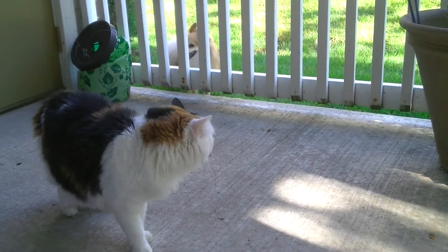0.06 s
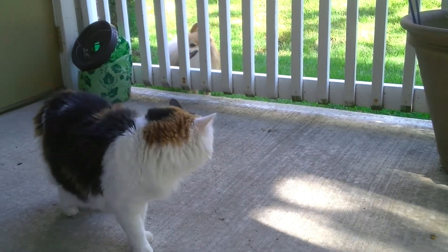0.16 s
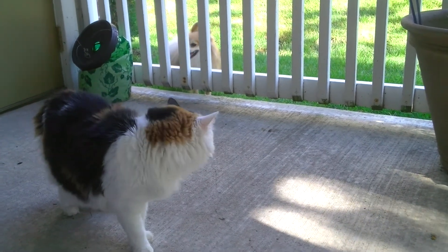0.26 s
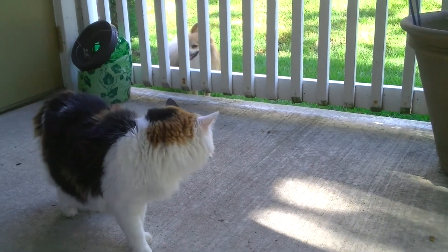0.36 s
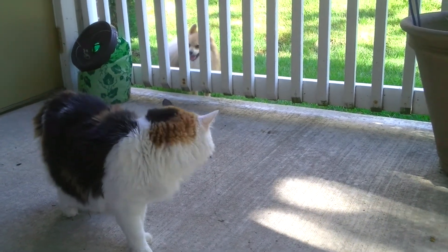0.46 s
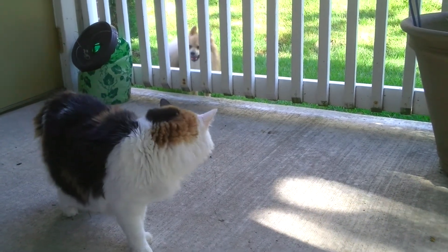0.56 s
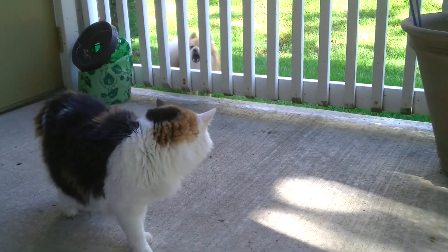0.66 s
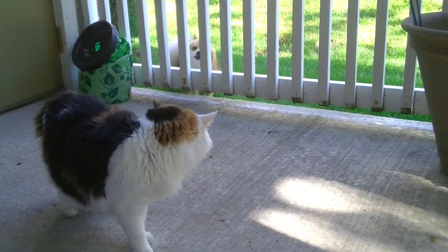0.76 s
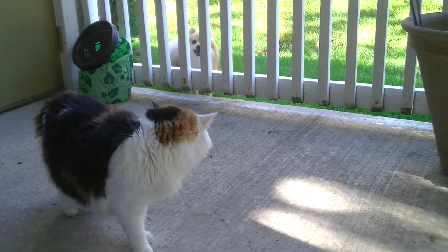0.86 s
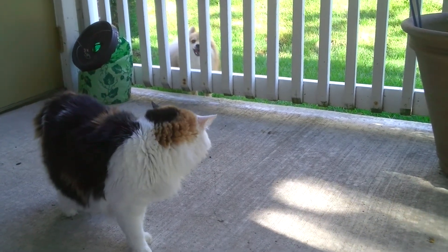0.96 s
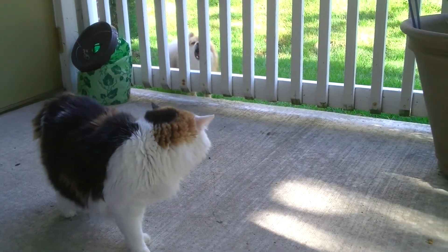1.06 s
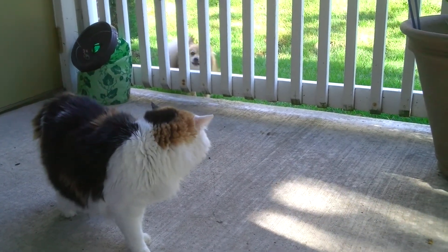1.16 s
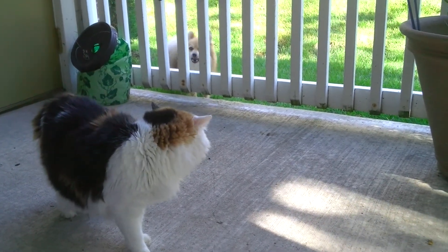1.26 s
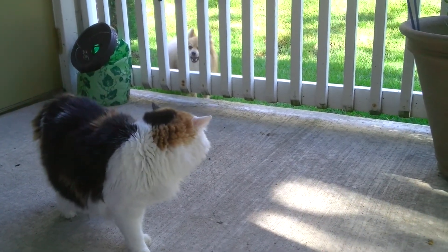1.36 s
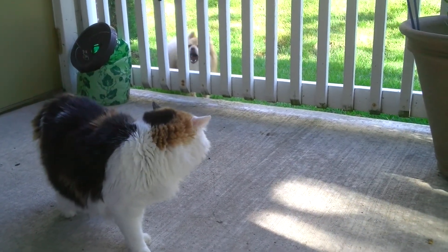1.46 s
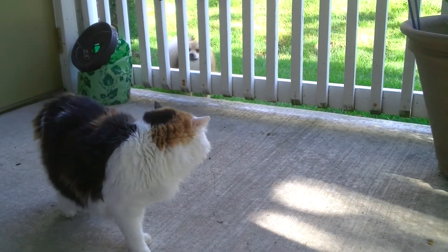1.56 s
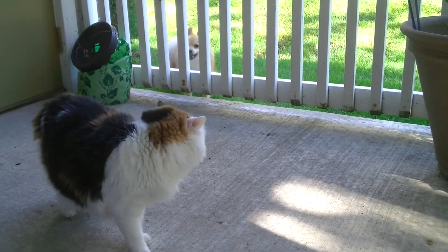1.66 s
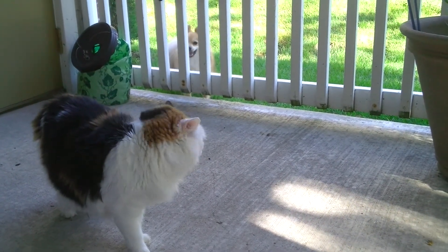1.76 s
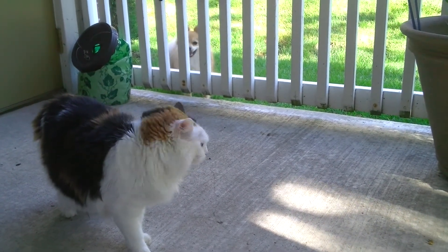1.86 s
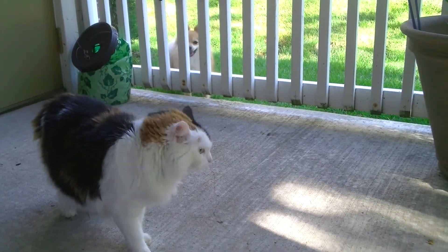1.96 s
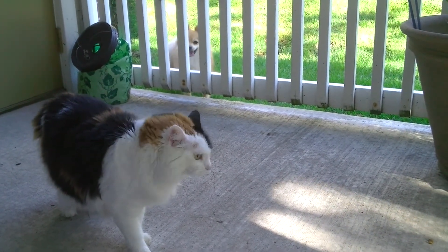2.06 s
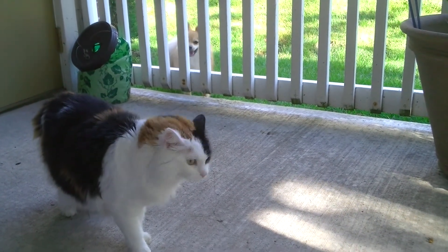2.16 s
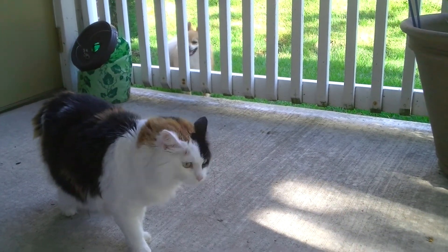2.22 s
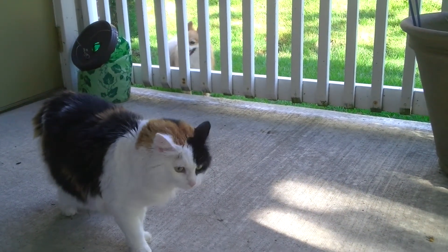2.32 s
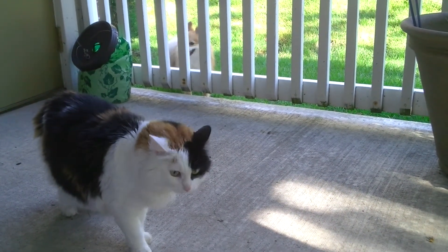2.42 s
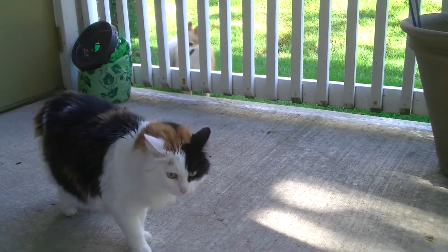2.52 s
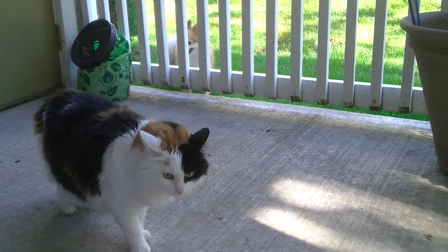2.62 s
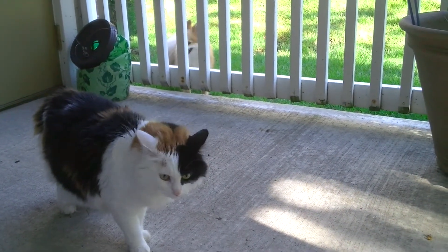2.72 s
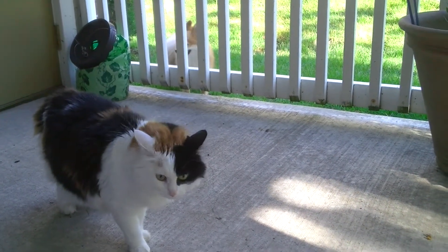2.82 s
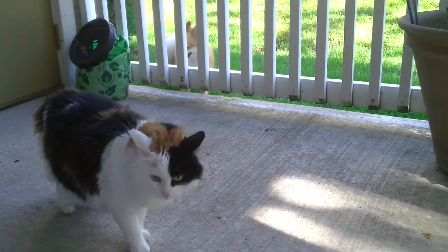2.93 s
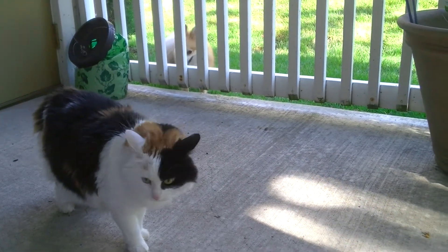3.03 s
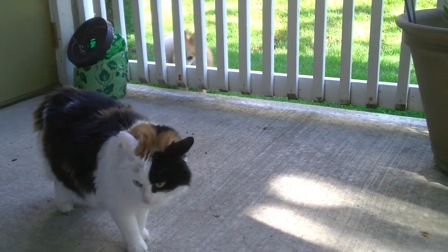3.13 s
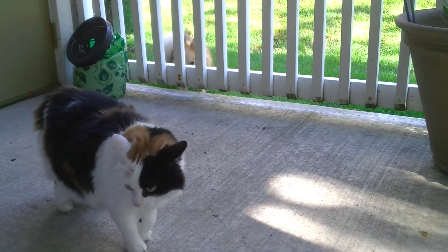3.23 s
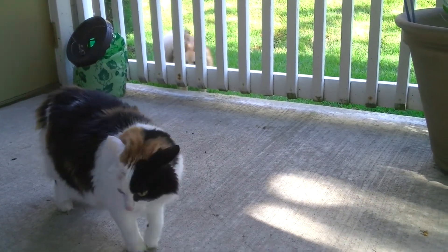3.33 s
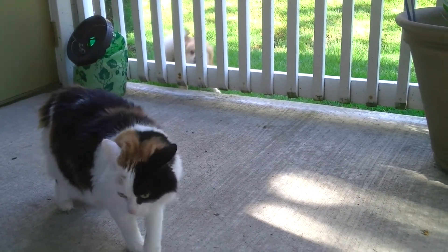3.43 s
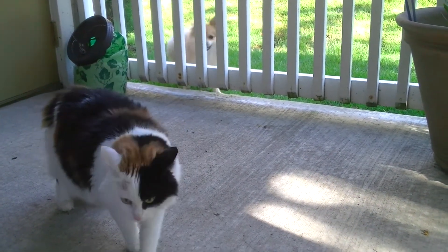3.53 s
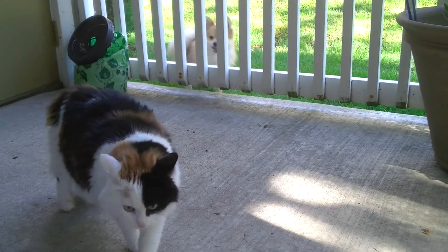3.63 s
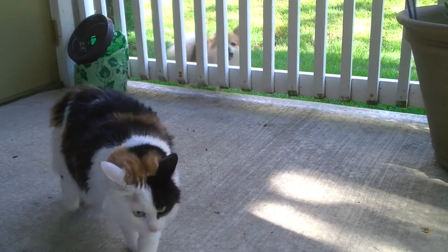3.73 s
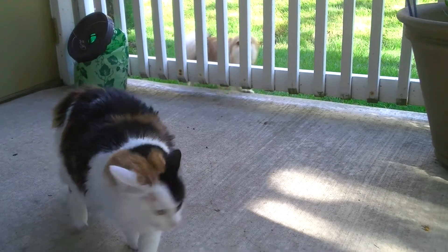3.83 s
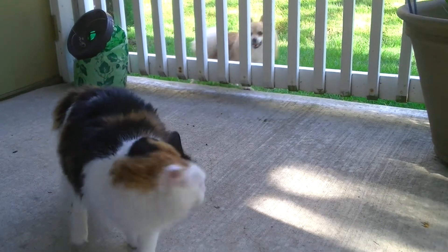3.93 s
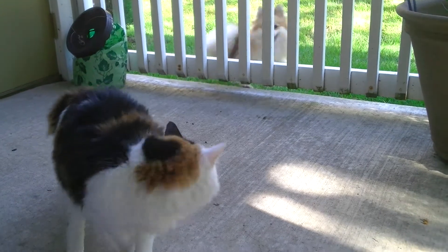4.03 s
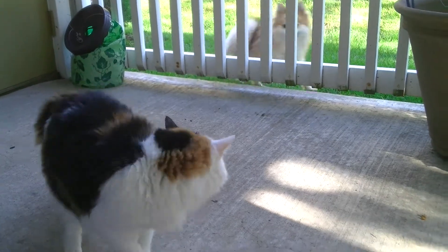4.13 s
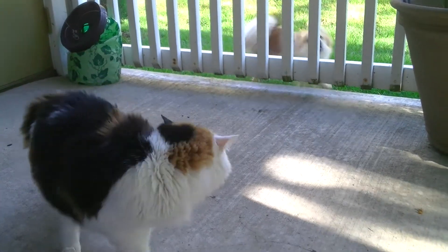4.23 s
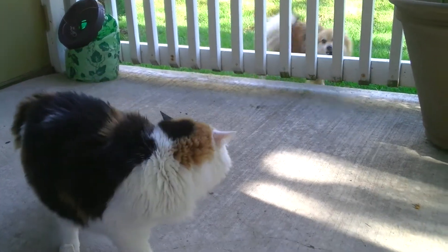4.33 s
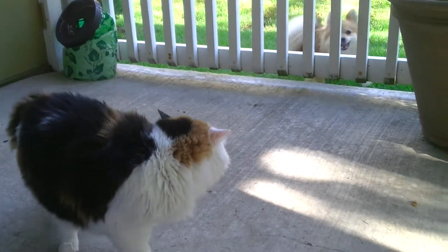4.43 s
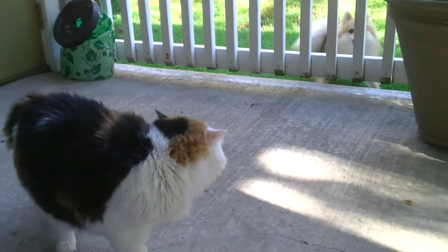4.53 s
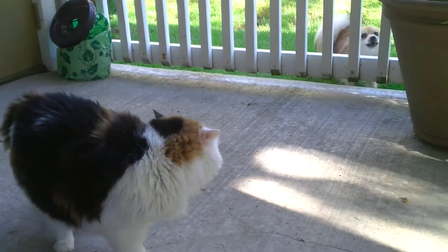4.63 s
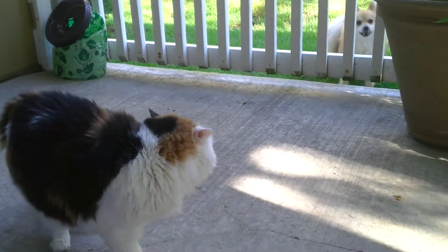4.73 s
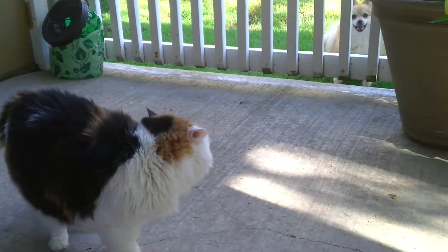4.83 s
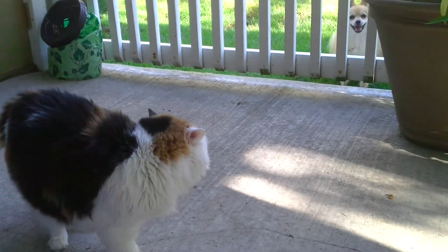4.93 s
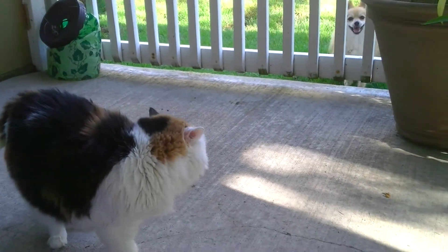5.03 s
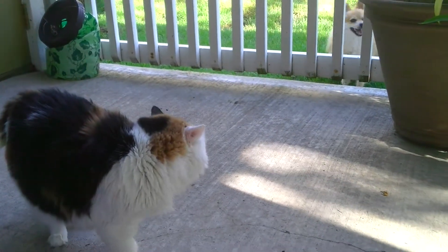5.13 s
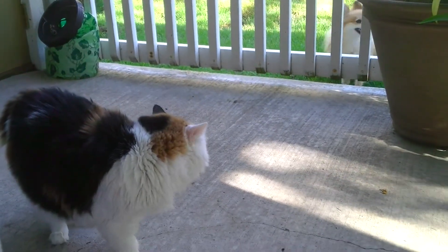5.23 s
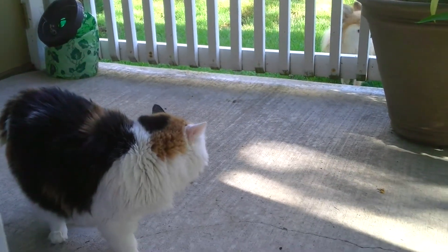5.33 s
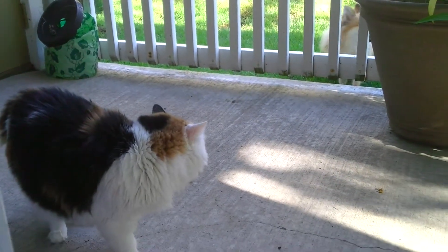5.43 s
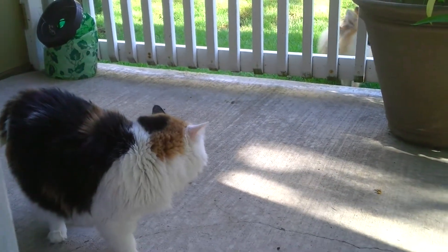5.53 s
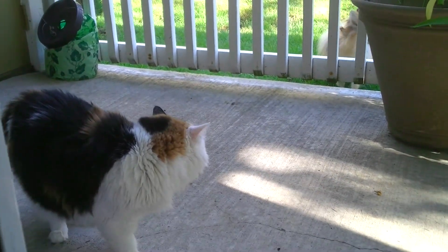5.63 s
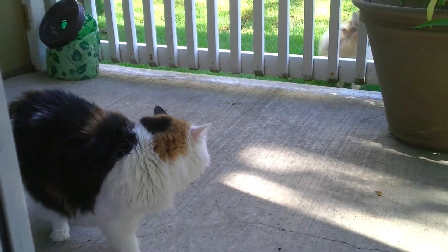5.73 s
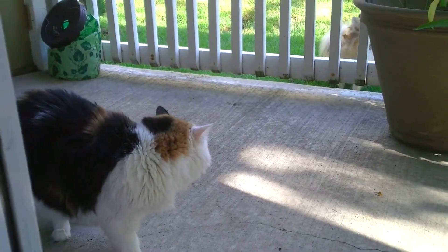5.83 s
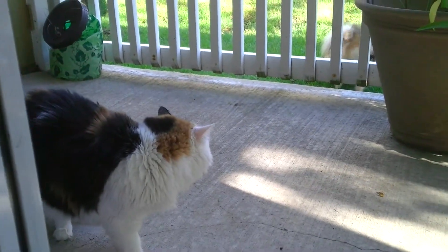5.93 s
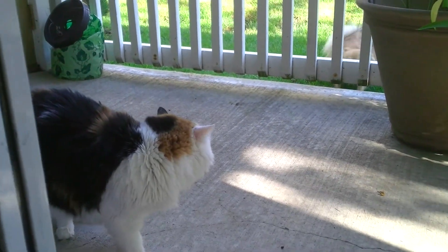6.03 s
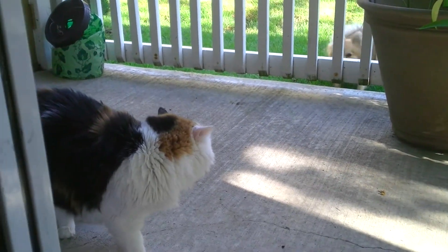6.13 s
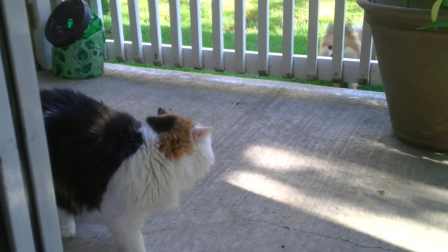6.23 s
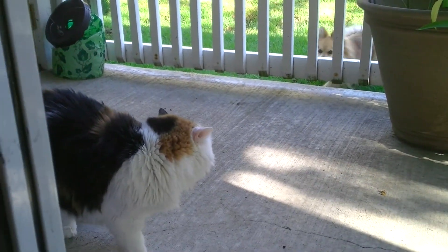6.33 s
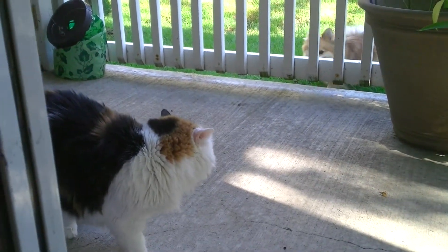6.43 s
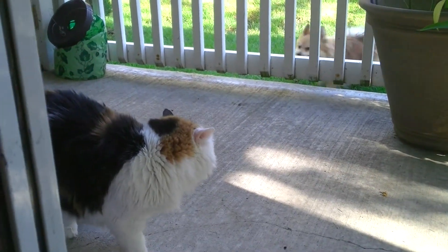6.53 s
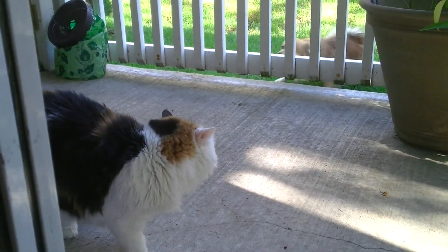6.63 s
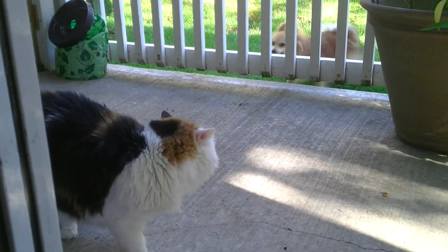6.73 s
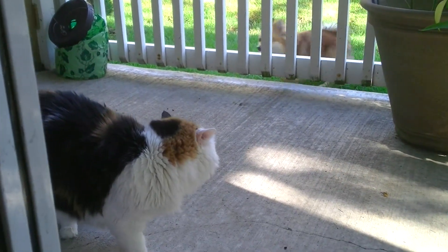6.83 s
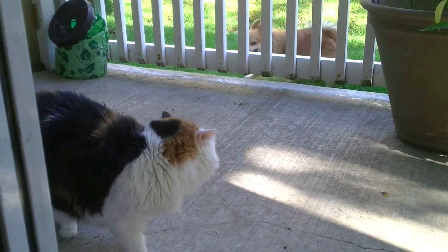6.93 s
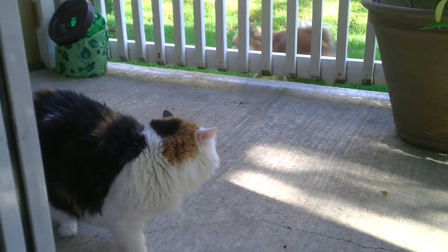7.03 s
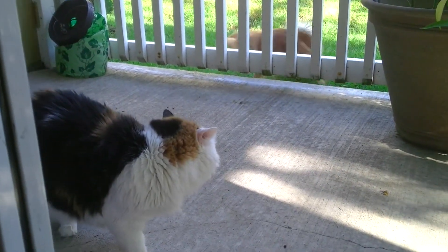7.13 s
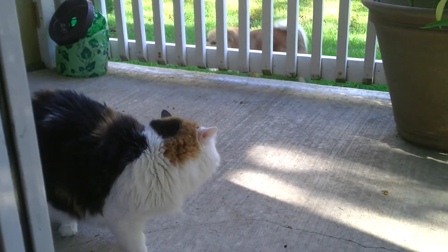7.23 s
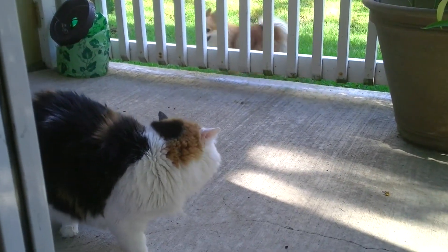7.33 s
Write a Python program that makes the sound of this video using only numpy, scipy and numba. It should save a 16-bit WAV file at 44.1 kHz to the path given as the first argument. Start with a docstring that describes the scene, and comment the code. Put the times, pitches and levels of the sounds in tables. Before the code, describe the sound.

A steady, faint outdoor hiss opens the scene, heard by a camera's stereo microphones on a concrete porch. At about 0.65 seconds a small dog on the lawn barks, then again at 1.1 and 1.5: hoarse, high, abrupt yelps around a seventh of a second long, arching up quickly and falling off as the mouth shuts. Each rings briefly on the porch and leaves a weak, slightly late echo from the yard. Between about 1.9 and 2.9 there are very soft rustles. A second burst of four barks comes at 3.3, 3.8, 4.2 and 4.6, growing lower and rougher. Two faint rustles follow near 5.25 and 5.5. A weaker, lower, raspier bark arrives at 5.95, then two strong, higher yaps at 6.55 and 7.1, the last tail fading into hiss. Peaks sound slightly held down, the extreme treble cut.

```python
"""A small dog on a lawn barks ten times in three bursts, heard by a camera's microphone pair on a concrete porch.
Each bark is one push of air: a hoarse yelp of uneven fold pulses and noise, arching in pitch and level,
which rings the mouth as the jaw opens and shuts. The porch rings, then come a faint delayed copy and the yard echo.
A steady outdoor hiss runs throughout, with soft rustles after the first and second bursts.
Last, the camera's limiter turns down peaks over its top level, and a low-pass cuts the extreme treble."""
import sys
import numpy as np
from scipy import signal
from scipy.fft import rfft, irfft, next_fast_len
from scipy.io import wavfile
from scipy.ndimage import uniform_filter1d, minimum_filter1d
from numba import njit

SR = 44100
rng = np.random.default_rng(int(sys.argv[2]) if len(sys.argv) > 2 else 0)


def inscribe(sig):
    """Save sig as 16-bit PCM at rate SR to the path in sys.argv[1].

    A 1-D sig is mono; a 2-D sig holds one channel per row.
    Samples are clipped to [-1, 1] before scaling.
    """
    pcm = np.round(np.clip(np.atleast_2d(sig).T, -1, 1) * 32767)
    wavfile.write(sys.argv[1], SR, pcm.astype(np.int16))


N = 325017

# colour of the echoes from across the yard: (frequency [Hz], level [dB])
YARD_COLOUR = [(200, -27), (600, 5.5), (800, 15), (950, -4.5), (1300, 2.5), (1500, 2), (1740, 3.5),
               (2400, -1), (4000, -3.5), (7000, -22.5), (14000, -43.5)]

# the folds tighten toward the crest and slacken after it; slack pitch and voicing are shares of the full ones
TIGHTEN_S, SLACKEN_S, SLACK_PITCH, SLACK_VOICING = 0.02, 0.065, 0.6, 0.38
# the mouth snaps widest just before the crest, then shuts: the tongue resonance sinks and the treble dulls
GAPE_LEAD_S, OPEN_S, SHUT_S, SHUT_OPENING = 0.0098, 0.027, 0.045, 0.5
TONGUE_SINK, DULLING_DB = 0.74, 13
# the voice is clearest at the widest gape and breaks up after it
VOICE_IN_S, VOICE_OUT_S = 0.016, 0.028
# breathy low body of the bark, near its fundamental pitch, strongest at the widest gape
BODY_HZ, BODY_WIDTH_HZ, BODY_S, BODY_DB = 518, 370, 0.014, -15
# the air rises steeply until shortly before the crest, swells on to it, then sags and stops
ATTACK_DB_PER_S, ATTACK_LEAD_S, SWELL_DB, RELEASE_S = 1300, 0.023, 6, 0.022
# the upper resonances change level for a moment at the widest gape, around a resting level
FLARE_S, BRIGHT_DB = 0.0097, -4.5


def dog():
    """Ten pushes of air at their moments, each placed left or right by a level difference."""
    # barks: (start [s], relative level [dB], top pitch before jitter [Hz], length [s], time to the crest [s],
    # sag after it [dB/s], nominal jaw resonance [Hz], tongue resonance at widest gape [Hz],
    # relative tongue level [dB], flare [dB], relative rasp level [dB], roughness [0-1],
    # left minus right before the microphone pair [dB])
    barks = [(0.649, -2, 697.8, 0.171, .062, 115, 1200, 3010, 7, 0.5, 3, 0.51, -4),
             (1.079, 0, 644.6, 0.139, 0.046, 131, 1545, 2750, -4.5, 13, 2, 0.47, -2),
             (1.475, 0, 653.5, 0.15, .052, 141, 1507, 2800, 2, 12.5, -1, 0.28, -1.5),
             (3.342, -1, 713.7, 0.13, 0.054, 123, 1280, 3020, -1.5, 9.5, -3, 0.52, 0.5),
             (3.762, -1.5, 641.2, 0.131, .047, 137, 1500, 2970, 7.5, 5.5, 3, 0.46, -1),
             (4.194, 0, 576.7, 0.12, 0.052, 109, 1500, 2720, -1.5, 8.5, -1, 0.62, -1),
             (4.572, -2, 591.7, 0.145, .053, 142, 1377, 2660, -.5, 11, 1, 0.61, 0.5),
             (5.956, -4, 525, 0.14, .06, 124, 1440, 2720, -1.5, -2, -3.5, 0.75, 3.5),
             (6.561, -0.5, 720.2, .14, 0.051, 93, 1590, 2980, 3, -16, -5.5, 0.63, 1),
             (7.122, -1.5, 688.8, 0.12, 0.049, 148, 1464, 3510, -4.5, 14.5, -4, 0.41, 0.5)]
    out = np.zeros((2, N + SR))
    for start, *shape, pan_db in barks:
        sound = bark(*shape)
        at = int(start * SR)
        sides = undb([[pan_db / 2], [-pan_db / 2]])
        out[:, at:at + len(sound)] += sound * sides
    return out[:, :N] * undb(-15.5)


def bark(db, top_hz, length, crest_s, sag_db_per_s, jaw_hz, tongue_hz, tongue_db, flare_db, rasp_db, rough):
    """One push of air tightens the vocal folds; their uneven pulses and puffs ring the opening and closing mouth."""
    # what leaves the mouth: (frequency [Hz], level [dB])
    mouth = [(100, -38), (300, -23.5), (550, -20.5), (850, -5), (1100, 5), (3200, 3), (5200, -4),
             (6800, -10), (8500, -14), (10000, -20), (11500, -48), (16000, -28)]
    # muzzle resonances behind the rasp: (nominal frequency [Hz], width [Hz], relative level [dB])
    muzzle = [(4160, 620, -3), (5360, 1600, -11.5), (7070, 524, 10.5)]
    n = SR // 5
    t = np.arange(n) / SR

    # push of air and fold tension
    tension = arch(t, crest_s, TIGHTEN_S, SLACKEN_S)
    attack = undb(ATTACK_DB_PER_S * np.minimum(t - crest_s + ATTACK_LEAD_S, 0))
    stop = np.clip((length - t) / RELEASE_S, 0, 1)
    swell_db = SWELL_DB * (tension - 1)
    sag_db = -sag_db_per_s * (t - crest_s)
    effort = attack * stop * undb(np.where(t < crest_s, swell_db, sag_db))
    pitch = top_hz * (SLACK_PITCH + (1 - SLACK_PITCH) * tension)

    # movement of the mouth
    gape_s = crest_s - GAPE_LEAD_S
    voicing = SLACK_VOICING + (1 - SLACK_VOICING) * arch(t, gape_s, VOICE_IN_S, VOICE_OUT_S)
    opening = SHUT_OPENING + (1 - SHUT_OPENING) * arch(t, gape_s, OPEN_S, SHUT_S)
    flare = flare_db * arch(t, gape_s, FLARE_S, FLARE_S)
    bright_db = BRIGHT_DB + flare - DULLING_DB * (1 - opening)

    # hoarse folds lose their beat and flutter in strength
    hoarse = np.clip(1 - voicing * (1 - rough), 0.02, 1)
    jitter = 1 + 0.11 * hoarse * walk(n, rate=220)
    phase = 2 * np.pi * np.cumsum(pitch * jitter) / SR
    orders = np.arange(1, 9)[:, None]
    folds = unit(np.sum(np.cos(orders * phase) / orders ** 0.76, axis=0))
    # the breath noise puffs once per fold beat
    air = unit(rng.standard_normal(n) * (1 + 0.99 * np.cos(phase)))
    flutter = undb(1.95 * hoarse * walk(n, rate=280))
    source = (np.sqrt(1 - hoarse ** 2) * folds + 1.26 * hoarse * air) * flutter

    # opening the jaw lifts the lowest resonance; the upper ones slide down as the mouth shuts
    low = formant(source, jaw_hz * (0.45 + 0.61 * opening), 544.0) * undb(6.9 * (opening - 1))
    tongue = tongue_hz * (1 - TONGUE_SINK * (1 - opening))
    high = formant(source, tongue, 946.0) * undb(tongue_db + bright_db)
    # the throat grows louder as the mouth shuts
    throat_db = -5.5 + 14.15 * (1.5 - opening)
    throat = resonate(source, 2080 * (0.61 + 0.38 * opening), 318.0) * undb(throat_db)

    # air rushing through the muzzle
    slide = 0.8286 + 0.12 * opening
    rasp = sum(undb(d) * resonate(air * flutter, f * slide, 1. * w) for f, w, d in muzzle)
    rasp = rasp * undb(rasp_db - 4.5 + 0.42 * bright_db)

    low_air = formant(air, np.full(n, float(BODY_HZ)), float(BODY_WIDTH_HZ))
    body = unit(low_air) * arch(t, gape_s, BODY_S, BODY_S)
    inside = low + high + throat + rasp + undb(BODY_DB) * body
    return unit(colour(inside, mouth) * effort) * undb(db)


def arch(t, top_s, rise_s, fall_s):
    """A smooth hump, 1 at top_s; the rise and fall times reach down to 1/e."""
    return np.exp(-((t - top_s) / np.where(t < top_s, rise_s, fall_s)) ** 2)


@njit
def resonate(x, hz, width):
    """State-variable band-pass with a moving centre, gain 1 there."""
    y, band, low = np.empty(len(x)), 0., 0.
    for i in range(len(x)):
        g, k = np.tan(np.pi * hz[i] / SR), width / hz[i]
        v = (band + g * (x[i] - low)) / (1 + g * (g + k))
        band, low, y[i] = 2 * v - band, low + 2 * g * v, k * v
    return y


def formant(x, hz, width):
    """A resonance with steep skirts: the band-pass applied twice."""
    return resonate(resonate(x, hz, width), hz, width)


def surroundings(voice):
    """The porch rings almost at once; houses across the yard answer later and longer."""
    # colour of the porch ring: (frequency [Hz], level [dB])
    porch_colour = [(200, -29), (570, -11.5), (790, 12.5), (920, 6.5), (1180, -2.5), (1480, -2), (1720, 3),
                    (2050, -5.5), (2400, -10), (2800, -0.5), (3600, -14.5), (4200, -2), (5100, -14.5),
                    (6300, -6.5), (9000, 3), (14000, -5)]
    porch = echoes(voice, porch_colour, delay=0.0061, build=0.0017, t60=0.28, treble_t60=0.29, db=-2.5)
    yard = echoes(voice, YARD_COLOUR, delay=0.089, build=0.032, t60=0.67, treble_t60=0.88, db=-25.0)
    return porch + yard


def echoes(x, spectrum, delay, build, t60, treble_t60, db):
    """Scattered reflections start late, build up and die away, bass and treble at their own rates (times in s)."""
    t = np.arange(SR) / SR
    age = np.maximum(t - delay, 0)
    scatter = rng.standard_normal(SR)
    lows = signal.sosfilt(signal.butter(2, 2500, fs=SR, output="sos"), scatter)
    highs = signal.sosfilt(signal.butter(2, 2500, "high", fs=SR, output="sos"), scatter)
    # each band falls 60 dB in its t60
    low_fade = np.exp(-np.log(1000) * age / t60)
    high_fade = np.exp(-np.log(1000) * age / treble_t60)
    fading = lows * low_fade - highs * high_fade
    response = unit(fading * (1 - np.exp(-age / build))) / np.sqrt(SR)
    return undb(db) * signal.fftconvolve(x, colour(response, spectrum))[:N]


def delayed_copy(x, delay_s, db):
    """A faint delayed copy of the bark in the yard's colour, thickening the tail."""
    delayed = np.interp(np.arange(N) - delay_s * SR, np.arange(N), x)
    return undb(db) * colour(delayed, YARD_COLOUR)


def outdoors():
    """Hiss of the open air, noise wavering slightly in level, with a few soft rustles of shaped noise."""
    # outdoor hiss: (frequency [Hz], relative level [dB])
    air_colour = [(25, -5), (60, -73), (110, -63), (220, -22), (380, -18.5), (780, -19.5), (1450, -4),
                  (1950, -0.5), (2300, -9), (3400, -14.5), (5300, -13), (6600, -3.5), (7700, -21),
                  (9800, -31.5), (11500, -39)]
    # rustles: (time of the top [s], level before flicker and microphone pair [dB], width at 1/e [s])
    rustles = [(1.902, -55, 0.051), (2.166, -51.5, 0.08), (2.414, -52, 0.074), (2.911, -53, 0.048),
               (5.248, -52.5, 0.036), (5.528, -52.5, 0.069)]
    # colour of a rustle: (frequency [Hz], relative level [dB])
    rustle_colour = [(300, -43), (1500, -10), (2800, -3), (4300, -6.5), (6500, -3), (8000, -29),
                     (12000, -27)]
    t = np.arange(N) / SR
    hiss_db = -48.5 + 0.5 * walk(N, rate=12.0)
    hiss = unit(colour(rng.standard_normal(N), air_colour)) * undb(hiss_db)
    brush = sum(undb(db) * np.exp(-(2 * (t - at) / length) ** 2) for at, db, length in rustles)
    grain = unit(colour(rng.standard_normal(N), rustle_colour))
    flicker = undb(2 * walk(N, rate=200))
    return hiss + brush * grain * flicker


def ports(x, table):
    """One sound as the two microphones hear it, each with its own gain and phase by frequency."""
    size = next_fast_len(N + SR // 10)
    side_db, lead = columns_at(table, np.fft.rfftfreq(size, 1 / SR))
    half = undb(side_db / 2) * np.exp(.5j * lead)
    # keeps the mean power of the pair
    balance = np.sqrt(np.cosh(np.log(undb(side_db))))
    pair = np.array([half, 1 / half]) / balance
    return irfft(rfft(x, size) * pair, size)[:, :N]


def undb(db):
    """Decibels to gain."""
    return 10 ** (np.asarray(db) / 20)


def unit(x):
    """Scale to rms 1."""
    return x / np.sqrt(np.mean(x ** 2))


def walk(n, rate):
    """Random levels, rate a second, joined by straight lines."""
    at = np.arange(n) * rate / SR
    return np.interp(at, np.arange(n // 8), rng.standard_normal(n // 8))


def columns_at(table, hz):
    """The columns of a frequency table, joined on a log axis."""
    points, *columns = np.transpose(table)
    return [np.interp(np.log(hz + 1), np.log(points), c) for c in columns]


def colour(x, spectrum):
    """Causal filter with the given (Hz, dB) points, from the cepstrum of the log gain."""
    size = 2048
    gain_db = columns_at(spectrum, np.fft.rfftfreq(size, 1 / SR))[0]
    cepstrum = irfft(np.log(undb(gain_db)))
    # folding the cepstrum forward makes the filter minimum phase
    cepstrum[1:size // 2] *= 2
    cepstrum[size // 2 + 1:] = 0
    response = irfft(np.exp(rfft(cepstrum)))
    return signal.fftconvolve(x, response)[:len(x)]


def scene():
    """Dog, echoes and hiss; a share of the diffuse sound is opposite in sign at the two microphones."""
    # microphone pair toward the dog: (frequency [Hz], left minus right [dB], phase lead of left [rad])
    dog_ports = [(150, 5.5, -3.5), (590, 7.5, -2.5), (716, 6, -2.5), (1090, 8, -1.5), (1810, 6.5, -1.58),
                 (2500, -1, -1.47), (3780, -5, -0.65), (5200, 3, 0.6), (7300, 5.5, -1), (8500, -3.5, -2)]
    # microphone pair toward the open air: (frequency [Hz], left minus right [dB], phase lead of left [rad])
    air_ports = [(60, -0.5, -15), (200, -0.5, -3), (700, 0.5, -2), (1320, 8.5, -2), (2360, -0.5, -1.6),
                 (4140, -3, 0.8), (6500, 4.5, -1.4), (8500, -2, -1.5)]
    direct = dog()
    voice = direct.mean(axis=0)
    apart = np.array([[1], [-1]])
    reflected = surroundings(voice) + delayed_copy(voice, delay_s=0.059, db=-19.0)
    diffuse = undb(-10.5) * apart * ports(surroundings(voice), dog_ports)
    barking = ports(direct + reflected, dog_ports) + diffuse
    hiss = ports(outdoors(), air_ports) + undb(-8.0) * apart * ports(outdoors(), air_ports)
    return barking + hiss


@njit
def follow(x, release):
    """Peak level that rises at once and falls slowly."""
    out, level = np.empty(len(x)), 0.
    for i in range(len(x)):
        level = max(x[i], level * (1 - release))
        out[i] = level
    return out


def limiter(x, top_db, release_s):
    """Turns both channels smoothly down while their peaks are over the top level."""
    peak = follow(np.abs(x).max(axis=0), 1 / (release_s * SR))
    gain = 1 / np.maximum(peak / undb(top_db), 1)
    held = minimum_filter1d(gain, size=128)
    return x * uniform_filter1d(uniform_filter1d(held, size=64), size=64)


def record(dry):
    """The camera limits the peaks, then a steep low-pass cuts the top."""
    held = limiter(dry, top_db=-2.5, release_s=0.17)
    top_hz = 15500
    return signal.sosfilt(signal.ellip(8, 0.2, 80, top_hz, fs=SR, output="sos"), held)


dry = scene()
out = record(dry)
inscribe(out)
```